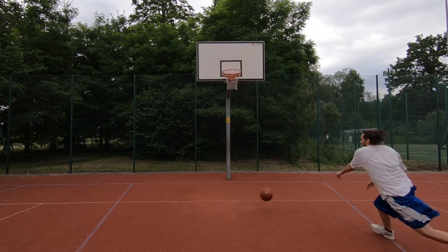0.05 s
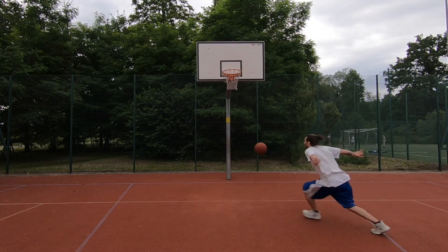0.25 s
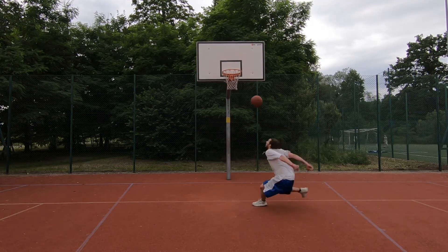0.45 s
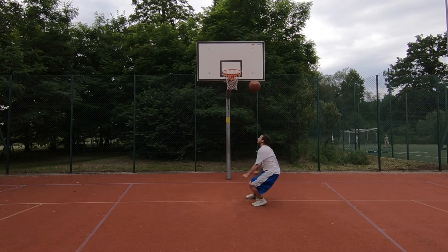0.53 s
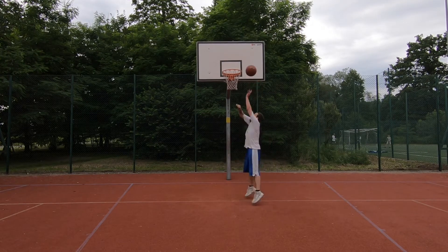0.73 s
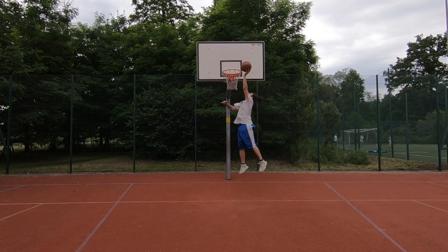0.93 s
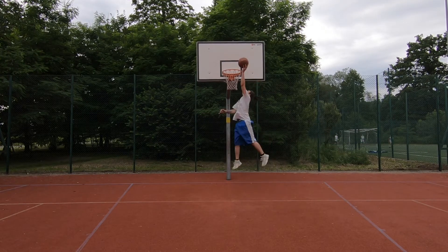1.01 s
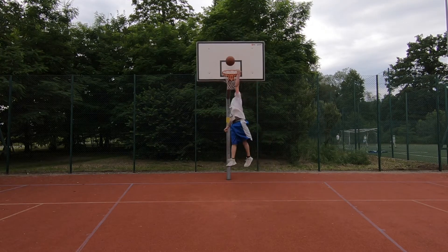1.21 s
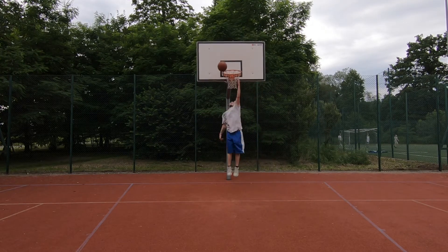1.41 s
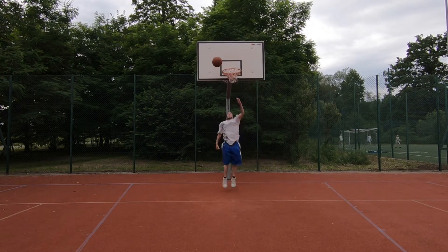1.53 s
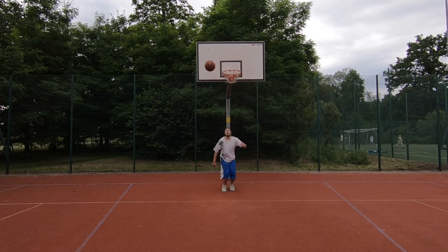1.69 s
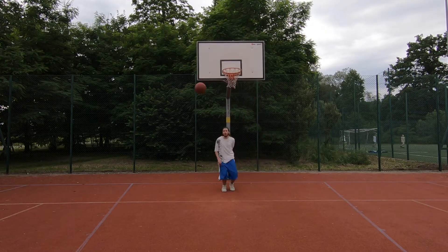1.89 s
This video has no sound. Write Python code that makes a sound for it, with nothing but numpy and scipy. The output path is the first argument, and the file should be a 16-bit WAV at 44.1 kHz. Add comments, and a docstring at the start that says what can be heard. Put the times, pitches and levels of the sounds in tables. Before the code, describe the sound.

A basketball bounces once on an outdoor court. Shoes scuff and hands catch the ball, then it hits the hoop, rattling the steel rim against a booming backboard. Faint birds and a low hum lie behind.

```python
"""An outdoor basketball court. The ball bounces once: an impact, then free vibration of shell and cavity.
A player plants his feet, jumps and catches it, each contact a dull thud and a scuff of friction noise.
Ball and hand hit the hoop, exciting the normal modes of backboard, steel rim and pole: the pole thuds,
and the released rim rattles against the booming board. Faint birds, a low hum and a hiss lie behind."""
import sys
import numpy as np
from scipy import signal
from scipy.io import wavfile
from scipy.ndimage import uniform_filter1d

SR = 44100
rng = np.random.default_rng(int(sys.argv[2]) if len(sys.argv) > 2 else 0)


def generate_wav(sig):
    """Save sig (samples, or channels by samples) to the path in sys.argv[1] as 16-bit PCM at SR."""
    pcm = np.round(np.clip(np.atleast_2d(sig).T, -1, 1) * 32767).astype(np.int16)
    wavfile.write(sys.argv[1], SR, pcm)


N = 85995
T = np.arange(N) / SR


def amp(db):
    """Amplitude ratio of a level in decibels."""
    return 10 ** (np.asarray(db) / 20)


def unit_rms(x):
    """Normalisation to an rms of 1."""
    return x / np.sqrt(np.mean(x ** 2) + 1e-20)


def curve_at(points, hz):
    """Interpolation on a logarithmic frequency axis."""
    f, value = np.transpose(points)
    return np.interp(np.log(hz + 1), np.log(f + 1), value)


def pan(db):
    """Level difference, left minus right, as a pair of gains."""
    return amp(np.array([[db], [-db]]) / 2)


def add(mix, start, sound):
    """Superposition: a sound joins the mix at start, in seconds."""
    part = mix[:, max(round(start * SR), 0):][:, :sound.shape[-1]]
    part += sound[..., :part.shape[1]]


def colour(x, spectrum):
    """Minimum-phase filter: the phase follows from the log gain by the Hilbert transform."""
    size = 4096
    log_gain = np.log(amp(curve_at(spectrum, abs(np.fft.fftfreq(size, 1 / SR)))))
    response = np.exp(np.conj(signal.hilbert(log_gain)))
    taps = np.fft.ifft(response).real[:size // 2]
    return signal.fftconvolve(np.atleast_2d(x), taps[None], axes=1)[:, :x.shape[-1]]


def noise(spectrum, correlation, length=N):
    """Partial coherence: two channels of coloured noise share a common part."""
    left, independent = rng.standard_normal((2, length))
    right = correlation * left + np.sqrt(1 - correlation ** 2) * independent
    return unit_rms(colour(np.array([left, right]), spectrum))


def wander(size):
    """Random modulation: noise of rms 1, smoothed twice over size samples."""
    return unit_rms(uniform_filter1d(uniform_filter1d(rng.standard_normal(N), size), size))


def onset(x, rise):
    """Linear attack lasting rise seconds."""
    return x * np.minimum(T[:x.shape[-1]] / rise, 1)


def envelope(rise, fade):
    """Linear attack, then exponential decay with time constant fade; both in seconds."""
    return onset(np.exp(-np.maximum(T[:SR // 3] - rise, 0) / fade), rise)


def burst(spectrum, rise, fade, correlation):
    """Broadband transient: noise under a decaying envelope."""
    shape = envelope(rise, fade)
    return noise(spectrum, correlation, len(shape)) * shape


def ring(modes, scatter_db=0, loose=False):
    """Free vibration as damped sines; a loose part, struck anywhere, takes random phases."""
    t = T[:SR * 2 // 3]
    out = np.zeros(len(t))
    for hz, db, t60 in modes:
        strength, phase = rng.standard_normal(2)
        decay = amp(db + scatter_db * strength - 60 * t / t60)
        out += decay * np.sin(2 * np.pi * (hz * t + loose * phase))
    return out


def whistles(notes, warble, ease=1):
    """Frequency modulation: short warbling glides, which level off when ease exceeds 1."""
    out = np.zeros((2, N))
    for start, length, from_hz, to_hz, db, side in notes:
        progress = T[T < length] / length
        hz = to_hz + (from_hz - to_hz) * (1 - progress) ** ease
        hz *= 1 + warble * wander(size=80)[:len(progress)]
        tone = np.sin(2 * np.pi * np.cumsum(hz) / SR)
        add(out, start, amp(db) * np.sin(np.pi * progress) * tone * pan(side))
    return out


def reverberation(x):
    """Diffuse reflection from fence and trees: convolution with a decaying noise tail."""
    # reverberation time: f/Hz, t60/s
    decay_times = [(100, 0.94), (500, 0.28), (2000, 0.71), (6000, 0.26), (10000, 0.094)]
    hz, t, bands = signal.stft(rng.standard_normal((2, SR * 2 // 3)), SR, nperseg=256)
    decay = amp(-60 * t / curve_at(decay_times, hz)[:, None])
    tail = onset(signal.istft(bands * decay, SR, nperseg=256)[1], rise=0.021)
    return signal.fftconvolve(x, tail / np.linalg.norm(tail[0]), axes=1)[:, :N]


def air():
    """Ambient noise: a low outdoor hum and a hiss among the trees, each slowly amplitude-modulated."""
    # spectral shapes of hum and hiss: f/Hz, level/dB
    hum_spectrum = [(25, -24.5), (45, -7.5), (70, -3.5), (100, -11.5), (155, 5.5), (230, -0.5),
                    (310, -11.5), (450, -16), (620, -18.5), (790, -15.5), (1100, -24.5), (2000, -25),
                    (4000, -44), (8400, -49), (11000, -53.5)]
    hiss_spectrum = [(800, -3.5), (2000, -6.5), (3200, 2.5), (4500, -1.5), (6000, -0.5), (7200, -7.5),
                     (9000, -7.5)]
    # drift of the hiss: t/s, level/dB
    hiss_levels = [(0, -54.5), (.18, -57), (.3, -58.5), (.45, -63), (.64, -64.5), (.73, -52.5), (.9, -55.5),
                   (1.08, -63), (1.27, -62.5), (1.35, -54.5), (1.5, -54.5), (1.95, -58.5)]
    hum_gain = amp(-52 + 1.3 * wander(size=2500))
    hum = hum_gain * noise(hum_spectrum, correlation=0.19) * pan(db=2)
    hiss_gain = amp(np.interp(T, *np.transpose(hiss_levels)))
    return hum + hiss_gain * noise(hiss_spectrum, correlation=0.12)


def birds():
    """Scattering by the trees blurs the whistles of distant birds."""
    # notes: t/s, length/s, first f/Hz, last f/Hz, level/dB, L-R/dB
    notes = [(0, .04, 3300, 4200, -53.5, 4), (.02, .04, 4500, 5500, -56, 3),
             (.052, .04, 3000, 4500, -54, 5), (.075, .035, 4700, 5600, -55, 3),
             (.1, .06, 7400, 5900, -53, 2), (.143, .055, 6000, 5400, -49, 2),
             (.19, .21, 5550, 5500, -58, 0), (1.168, .055, 5300, 3200, -59, -3),
             (1.36, .06, 6000, 6300, -53, 3), (1.463, .022, 5900, 4400, -53, 0)]
    song = whistles(notes, warble=0.02, ease=1.6)
    return amp(-4) * song + amp(-6.5) * reverberation(song)


def shoes_and_hands():
    """Impact and friction: soles plant and scrape, then hands catch the ball with a rubbery squeak."""
    # contacts: t/s, rise/s, fade/s, thud level/dB, scuff level/dB, L-R/dB
    contacts = [(0.114, 0.0076, 0.02, -45, -65, -27), (0.4931, 0.0011, 0.025, -48, -59, -4),
                (0.51, 0.0069, 0.019, -41.5, -50.5, -6), (0.5278, 0.0015, 0.0058, -27.5, -46, -5),
                (0.5479, 0.0005, 0.003, -51, -46.5, -12), (.553, 0.0014, 0.019, -45, -49.5, -4.5),
                (.657, 0.0009, 0.0047, -37, -36, -5.5), (.661, 0.009, 0.018, -53, -35, -3.5),
                (.99, 0.016, .05, -51.5, -64, -9)]
    # spectral shapes of friction and impact: f/Hz, level/dB
    scuff_spectrum = [(150, -26.5), (500, 8.5), (1200, 4.5), (2000, 7.5), (3300, 6.5), (4700, -1.5),
                      (6300, 2), (9000, -8)]
    thud_spectrum = [(40, -38), (110, -5.5), (270, -3.5), (450, -10), (900, -22.5), (3000, -59)]
    # squeaks of the catch: t/s, length/s, first f/Hz, last f/Hz, level/dB, L-R/dB
    squeaks = [(.661, 0.0127, 5470, 6640, -39, 5), (.665, 0.017, 4100, 2200, -40, -3)]
    out = whistles(squeaks, warble=0.042)
    for start, rise, fade, thud_db, scuff_db, side in contacts:
        scuff = burst(scuff_spectrum, rise, fade, correlation=0.74)
        grit = amp(1.7 * wander(size=30)[:scuff.shape[1]])
        add(out, start, amp(scuff_db) * scuff * grit * pan(side))
        thud = burst(thud_spectrum, rise, fade, correlation=0.61)
        add(out, start, amp(thud_db) * thud * pan(db=2))
    return out + amp(-19.5) * reverberation(out)


def ball_slap(start):
    """Impulsive contact: rubber meets the court in a few ticks, so brief that their spectrum is broad."""
    # ticks of contact: delay/s, level/dB
    contacts = [(0, -6.5), (.0008, 1), (.0021, -10), (0.0101, -8.5)]
    # spectral shape of the slap: f/Hz, level/dB
    spectrum = [(100, -14), (350, 15), (650, -5), (1050, -4), (1350, 0), (1650, -11), (2400, -5.5),
                (2800, -10), (3150, -17.5), (4100, -18.5), (4700, -15), (6800, -16.5), (9000, -25.5)]
    # its stereo balance: f/Hz, L-R/dB
    balance = [(310, 15), (910, -6), (1560, -10), (2700, -1.5), (4600, 2), (8000, -2)]
    ticks = np.zeros((1, N))
    for delay, db in contacts:
        add(ticks, start + delay, amp([db]))
    slap = amp(5.5) * colour(ticks, spectrum)
    left = colour(slap, [(hz, db / 2) for hz, db in balance])
    right = colour(slap, [(hz, -db / 2) for hz, db in balance])
    out = np.vstack([left, right])
    puff = burst(spectrum, rise=0.0013, fade=0.0019, correlation=0.36)
    add(out, start, amp(-19.5) * puff * pan(db=-12.5))
    return out + amp(-22.5) * reverberation(out)


def ball_body(start):
    """Elastic rebound: the ball squashes with a thump, and its shell and air cavity resonate."""
    # modes of shell and cavity: f/Hz, level/dB, t60/s
    modes = [(414, -21, 0.05), (598, -40, 0.06), (910, -46, 0.091), (1026, -43.5, 0.083),
             (1204, -46.5, 0.09), (1820, -43, 0.042), (2322, -59, 0.06), (3350, -50.5, 0.058)]
    thump_hz, peak_s, width_s, rebound_s = 157, 0.0101, 0.0061, 0.013
    out = np.zeros((2, N))
    t = T - peak_s
    thump = -np.exp(-(t / width_s) ** 2) * np.cos(2 * np.pi * thump_hz * t)
    add(out, start, amp(-9.5) * thump * pan(db=7.5))
    add(out, start + rebound_s, ring(modes[:1]) * pan(db=5.5))
    add(out, start, amp(4) * ring(modes[1:]) * pan(db=-13.5))
    return out


def low_boom():
    """Gaussian decay: three low, fluttering tones die away after the bounce."""
    # tones: t/s, f/Hz, level/dB, rise/s, fade/s, L-R/dB
    tones = [(.243, 71, -28, .018, .1, -19), (.235, 120, -40, .02, .13, 12), (.225, 162, -40, .02, .13, 4)]
    out = np.zeros((2, N))
    for start, hz, db, rise, fade, side in tones:
        swell = onset(np.exp(-(T / fade) ** 2), rise)
        gain = amp(db + 3 * wander(size=700))
        add(out, start, gain * swell * np.sin(2 * np.pi * hz * T) * pan(side))
    return out


def faint_ring():
    """Random modulation of pitch and level makes a thin ring waver after the catch."""
    # partials: f/Hz, level/dB, glide/(Hz/s)
    partials = [(1362, -57.5, 10), (4230, -69.5, -350), (5080, -66, -800)]
    start, rise, fade = 0.61, 0.15, 0.18
    waver_hz, flutter_db = 26, 2.5
    out = np.zeros((2, N))
    swell = onset(np.exp(-(np.maximum(T - rise, 0) / fade) ** 2), rise)
    for hz, db, glide in partials:
        cycles = np.cumsum(hz + glide * T + waver_hz * wander(size=300)) / SR
        gain = amp(db + flutter_db * wander(size=600))
        add(out, start, gain * swell * np.sin(2 * np.pi * cycles) * pan(db=-11))
    return out


def backboard(blows):
    """Plate vibration: blows excite the board's low modes; single modes sing as the frame flexes."""
    # plate modes: f/Hz, level/dB, t60/s
    modes = [(121.3, -0.5, 0.23), (141.6, -5.5, 0.63), (165.6, -1, 0.27), (182.7, -0.5, 0.43),
             (228.7, -3.5, 0.5), (251.8, -10, 0.51), (282.1, -6, 0.35), (308.3, -8, 0.38),
             (363.6, -4, 0.16), (436.4, -8.5, 0.18), (510.5, -19.5, 0.31), (704.6, -17.5, 0.16),
             (804, -15, 0.06)]
    # spectral shape of the panel's rumble: f/Hz, level/dB
    spectrum = [(30, -25), (60, 3), (100, -9), (160, -12), (280, -6), (450, -3), (900, -21), (3000, -57)]
    # modes excited by a pull or release: t/s, f/Hz, level/dB, t60/s
    flexes = [(1.284, 790, -42, .13), (1.288, 132, -31, .25), (1.312, 303, -28, .45),
              (1.518, 452, -28, .13), (1.526, 160, -24, .3), (1.585, 295, -29, .2), (1.82, 162, -32, .2),
              (1.878, 715, -37, .12)]
    rise = 0.0026
    out = np.zeros((2, N))
    for start, db, *_ in blows:
        add(out, start, amp(db) * onset(ring(modes, scatter_db=1.5, loose=True), rise))
        add(out, start, amp(db - 7) * burst(spectrum, rise, fade=0.045, correlation=0.38))
    for start, hz, db, t60 in flexes:
        add(out, start, onset(ring([(hz, db, t60)], loose=True), rise=0.011))
    return out * pan(db=6)


def rim_ring(blows):
    """Inharmonic modes: the struck steel rim starts with a clack and rings on."""
    # rim modes, and the highest ones that only the hardest clank excites: f/Hz, level/dB, t60/s
    modes = [(1510, -14, .25), (1880, -13, .25), (2990, -7, .2), (3202, -5, .3), (3407, -1, .36),
             (3536, -2, .22), (3582, 1, .32), (3675, -6, .22), (3926, -3, .28), (4397, -3, .28),
             (4716, -4, .28), (4950, -8, .25), (5465, -4, .25), (5825, -3, .25), (6320, -6, .18),
             (7500, -15, .2)]
    top_modes = [(14330, -30.5, .3), (14560, -39, .3)]
    out = np.zeros((2, N))
    for start, _, steel_db, _, rise, fade in blows:
        steel = np.array([ring(modes, scatter_db=0.5, loose=True) for _ in range(2)])
        blended = (steel + 0.5 * steel[::-1]) / 2  # each channel takes in some of the other
        clack = amp(-11.5) + amp(-3) * np.exp(-T[:steel.shape[1]] / fade)
        add(out, start, amp(steel_db) * onset(blended * clack, rise))
    add(out, start=1.589, sound=onset(ring(top_modes), rise=0.002))
    return out


def chatter(rise, fade):
    """Intermittent contact: loose metal meets in a dying train of unevenly spaced impulses."""
    taps_per_s = 1300
    force = envelope(rise, fade)
    slots = np.arange(int(T[len(force) - 1] * taps_per_s))
    at = ((slots + rng.random(len(slots))) * SR / taps_per_s).astype(int)
    taps = np.zeros(len(force))
    taps[at] = rng.choice([-1, 1], len(at)) * force[at]
    return taps * np.sqrt(SR / taps_per_s)


def resonate(taps, spectrum, correlation):
    """Convolution: every tap excites the same short, dense impulse response of one part."""
    response = burst(spectrum, rise=1 / SR, fade=0.0025, correlation=correlation)
    return signal.fftconvolve(taps, response / np.linalg.norm(response[0]), axes=1)[:, :N]


def rim_rattle(blows):
    """Repeated impacts of the loose rim give bright clinks, a duller clatter and a shimmer of noise."""
    # spectral shapes of clink and clatter: f/Hz, level/dB
    clink_spectrum = [(1000, -24), (2400, -7.5), (3400, -2), (4200, -4.5), (5000, -7.5), (6000, -0.5),
                      (7000, -5), (9000, -19)]
    clatter_spectrum = [(100, -15), (400, 9.5), (700, -8), (1400, 2.5), (2400, -3.5), (3400, -6),
                        (5000, -6), (6300, -4.5), (9000, -30.5)]
    clink_taps, clatter_taps, shimmer = np.zeros((1, N)), np.zeros((1, N)), np.zeros((2, N))
    for start, _, steel_db, clatter_db, rise, fade in blows:
        add(clink_taps, start, amp(steel_db + 2) * chatter(rise, fade))
        add(clatter_taps, start, amp(clatter_db) * chatter(rise, fade))
        add(shimmer, start, amp(steel_db - 19) * burst(clink_spectrum, rise, fade=0.06, correlation=1))
    clinks = resonate(clink_taps, clink_spectrum, correlation=0.88)
    clatter = resonate(clatter_taps, clatter_spectrum, correlation=0.89)
    return clinks + clatter + shimmer


def knock():
    """Impact transient: one sharp, broadband knock on the hoop."""
    # spectral shape of the knock: f/Hz, level/dB
    spectrum = [(150, -3.5), (450, -0.5), (750, -10), (1350, 5.5), (2100, -5), (3000, 0), (4500, -7),
                (8000, -20)]
    return amp(-29.5) * burst(spectrum, rise=0.00019, fade=0.0031, correlation=0.75)


def pole():
    """Damped free vibration: the pole thuds once, its pitch starting high and sagging."""
    # pole modes: settled f/Hz, level/dB, t60/s
    modes = [(51.9, -17, 0.63), (65.94, -30.5, 1), (115.7, -25, 0.27), (152, -34.5, 0.75),
             (222, -28.5, 0.2), (435, -35.5, 0.075)]
    pitch_excess, settle_s = 0.313, 0.03
    steady = ring(modes)
    t = T[:len(steady)]
    warped_time = t + pitch_excess * settle_s * (1 - np.exp(-t / settle_s))
    return onset(np.interp(warped_time, t, steady), rise=0.0039) * pan(db=8.5)


def hoop():
    """Common excitation: the same blows drive board and rim; only the brighter sounds reverberate."""
    # blows: t/s, board level/dB, steel level/dB, clatter level/dB, rise/s, fade/s
    blows = [(1.281, -56, -56, -44, 0.0096, 0.015), (1.291, -36, -42, -48, 0.0032, 0.0012),
             (1.319, -31.5, -47.5, -41, 0.00064, 0.03), (1.4141, -35, -62, -46, 0.00039, 0.0076),
             (1.507, -47.5, -48.5, -42, 0.0026, 0.0066), (1.517, -36, -40, -38.5, 0.0013, 0.014),
             (1.529, -33.5, -60.5, -39.5, 0.0025, 0.065), (1.546, -32.5, -35.5, -39, 0.00079, 0.015),
             (1.574, -31.5, -53, -37, 0.0015, 0.027), (1.5887, -38.5, -27.5, -34.5, 0.0011, 0.0047),
             (1.641, -36, -38, -38, 0.00079, 0.014), (1.6764, -34.5, -40, -34.5, 0.0011, 0.0098),
             (1.734, -45, -42.5, -37.5, 0.0016, 0.011), (1.766, -38.5, -69, -47, 0.0011, 0.038),
             (1.858, -40.5, -56, -44.5, 0.0029, 0.017), (1.8787, -39.5, -57, -38, 0.0016, 0.014),
             (1.918, -45.5, -63, -54, 0.0031, 0.009)]
    low = backboard(blows)
    bright = rim_ring(blows) + rim_rattle(blows)
    add(bright, start=1.4133, sound=knock())
    add(low, start=1.4135, sound=pole())
    return low + bright + amp(-14) * reverberation(bright)


def scene():
    """Superposition of all sources on the court."""
    bounce_s = 0.2122
    background = air() + birds()
    player = shoes_and_hands()
    bounce = ball_slap(bounce_s) + ball_body(bounce_s) + low_boom()
    return background + player + bounce + faint_ring() + hoop()


def record(dry):
    """Low-pass filtering: a dull microphone, then a band limit at 14.9 kHz."""
    # microphone response: f/Hz, level/dB
    response = [(20, -4.5), (45, -2), (6600, 0.5), (7400, -5.5), (8300, -12.5), (9500, -20.5), (14000, -37)]
    low_pass = signal.firwin(511, 14900, window=("kaiser", 9), fs=SR)
    return signal.oaconvolve(colour(dry, response), low_pass[None], "same")


dry = scene()
out = record(dry)
generate_wav(out)
```